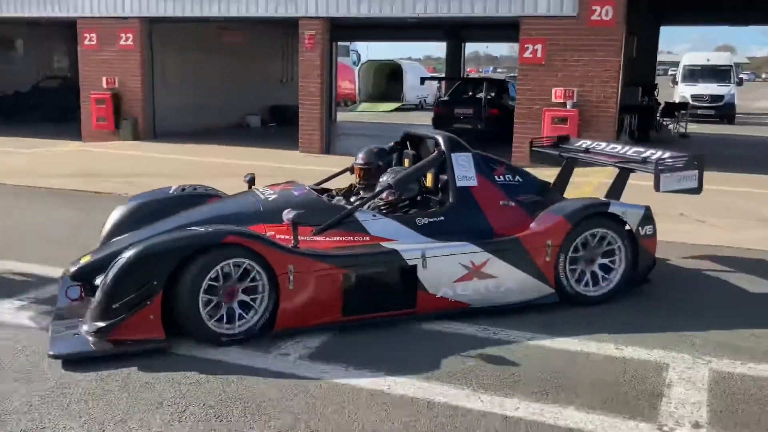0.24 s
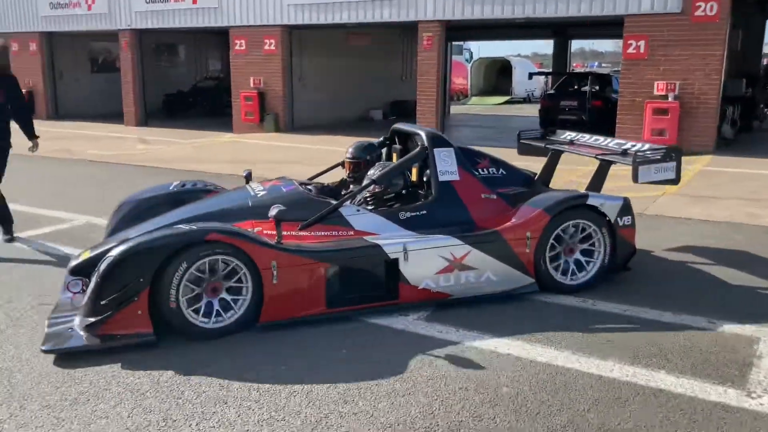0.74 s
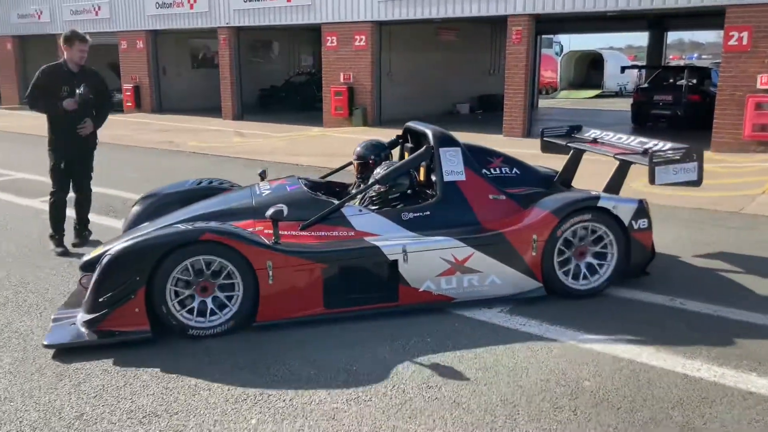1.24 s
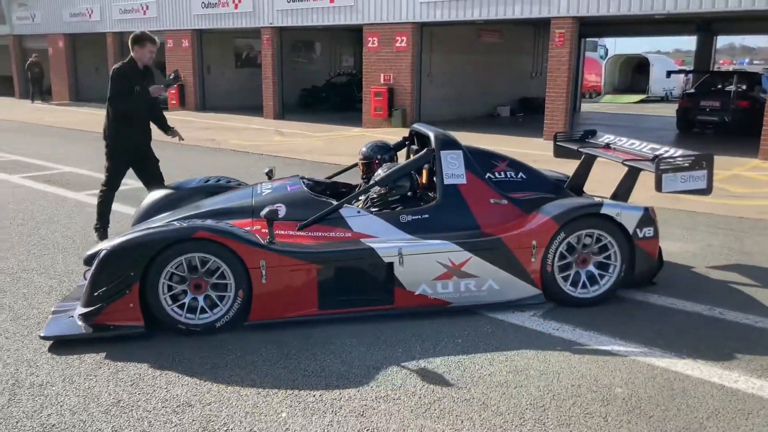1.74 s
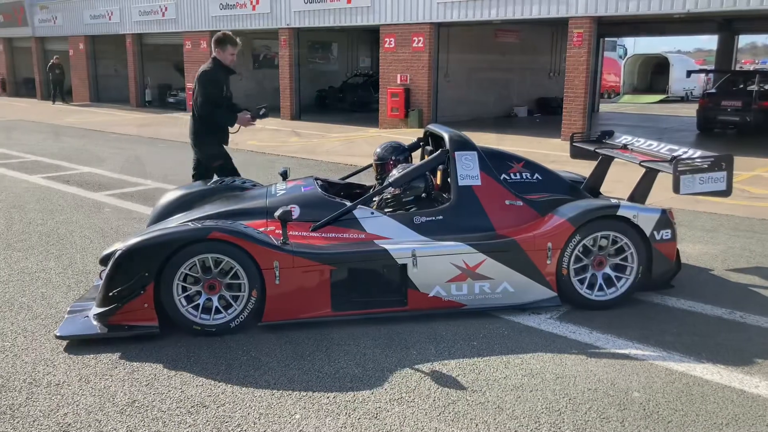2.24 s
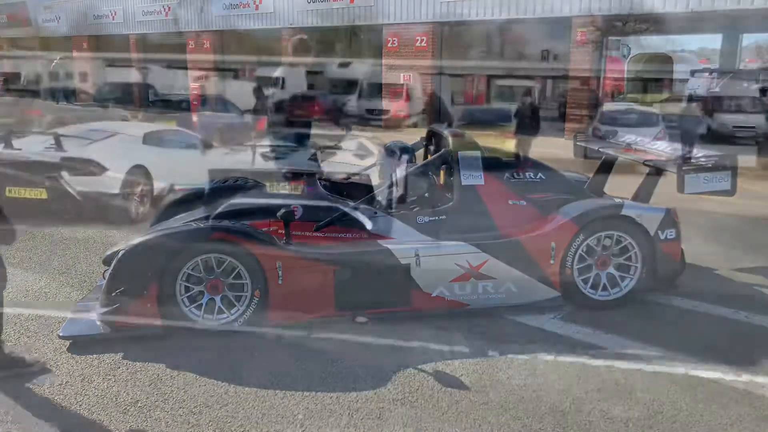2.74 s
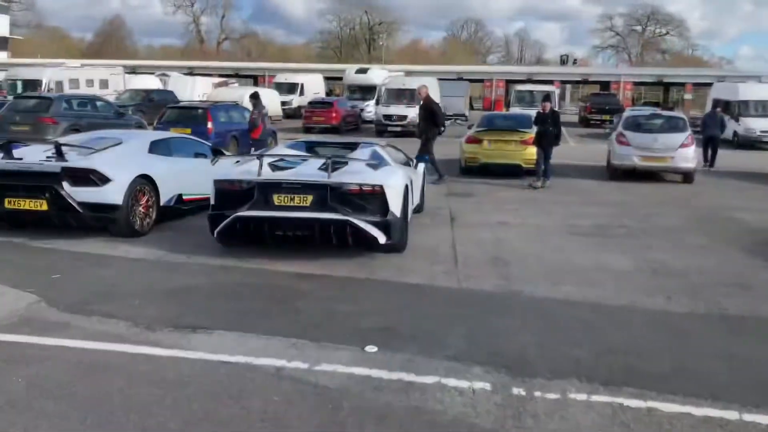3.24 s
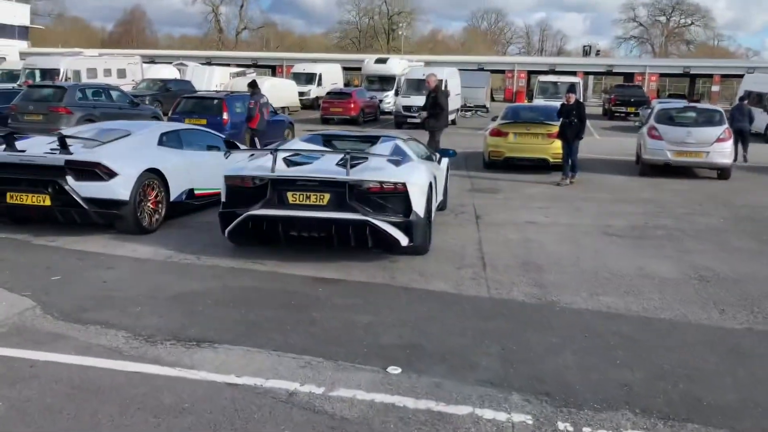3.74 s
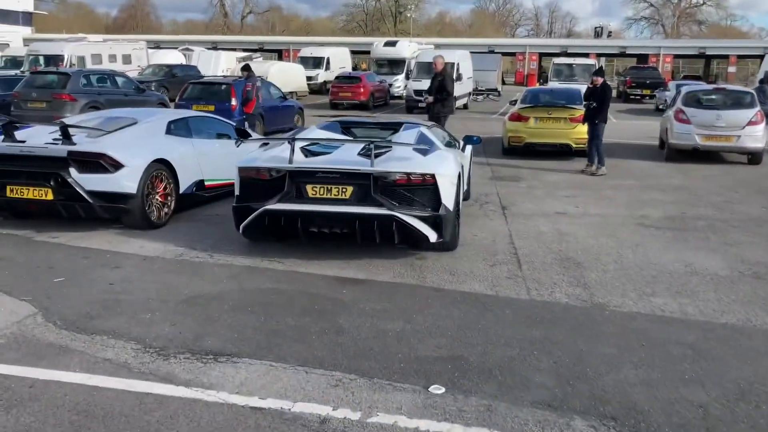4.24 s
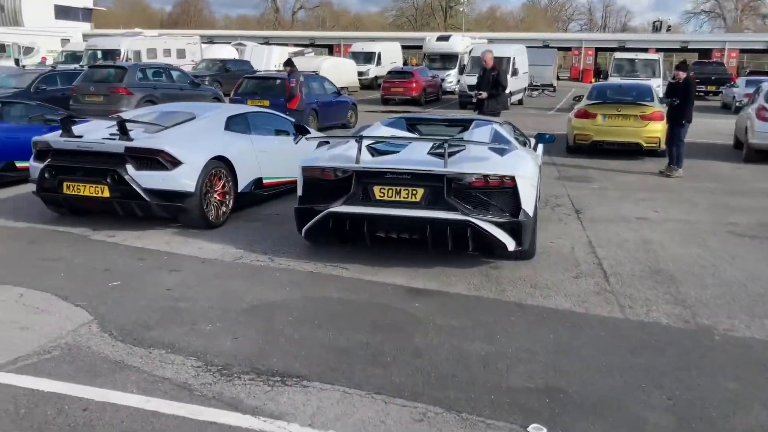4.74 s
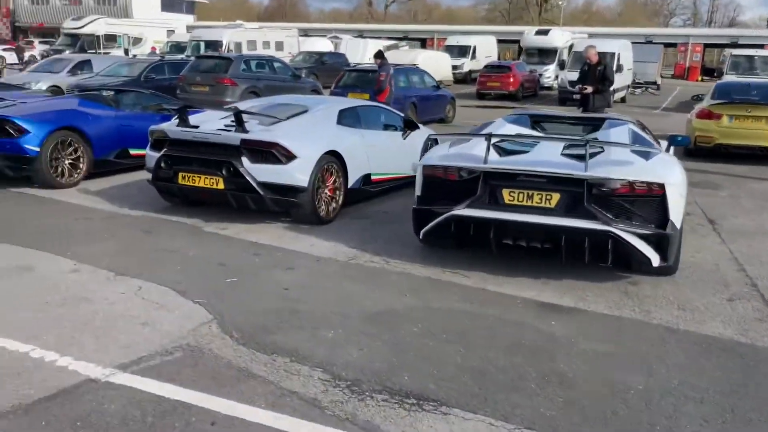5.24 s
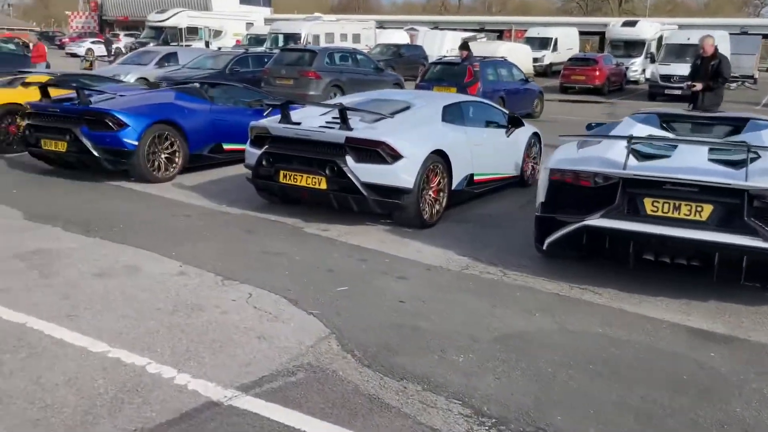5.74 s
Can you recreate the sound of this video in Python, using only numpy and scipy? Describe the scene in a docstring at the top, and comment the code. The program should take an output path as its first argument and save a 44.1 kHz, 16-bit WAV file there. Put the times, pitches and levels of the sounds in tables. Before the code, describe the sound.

Close to the microphone, a race car's engine holds a loud, throbbing idle with rattling and spits of air, joined by a short buzz and a light clink. About halfway through, the pit lane dissolves into an open car park. Gusts rumble on the microphone above a soft, humming wash of traffic, while a distant engine gently rises and falls and some dull taps come from slightly left.

```python
"""A racing engine idles close by in a pit lane: firings pulse the exhaust and ring the pipe, over clatter,
throbbing hiss and puffs of air. A panel buzzes at 1.4 s and a small part clinks at 1.8 s.
From 2.25 s the pit lane crossfades into a car park: wind buffets the microphone over a wash of traffic
with faint hums, and a far engine manoeuvres. From 4 s a few dull taps sound, a little to the left."""
import sys
import numpy as np
from scipy import signal
from scipy.fft import rfft, irfft
from scipy.io import wavfile
from scipy.ndimage import uniform_filter1d, minimum_filter1d

SR = 44100
rng = np.random.default_rng(int(sys.argv[2]) if len(sys.argv) > 2 else 0)


def dump(signal):
    """Clip the signal to [-1, 1] and save it as 16-bit WAV at the path in sys.argv[1]."""
    limited = np.clip(np.atleast_2d(signal).T, -1, 1)
    pcm = np.round(limited * 32767).astype(np.int16)
    wavfile.write(sys.argv[1], SR, pcm)


N = 264600
T = np.arange(N) / SR


def gain_of(db):
    """Decibels to gain."""
    return 10 ** (np.asarray(db) / 20)


def unit_rms(x):
    """Scales to rms 1."""
    return x / np.sqrt(np.mean(x ** 2) + 1e-20)


def automation(rows):
    """One lane per column after the time, read at every sample."""
    times, *columns = np.transpose(rows)
    return [np.interp(T, times, column) for column in columns]


def eq_db(curve, hz):
    """An EQ curve read on a log-frequency axis."""
    f, db = np.transpose(curve)
    return np.interp(np.log(hz + 1), np.log(f + 1), db)


def colour(x, curve):
    """Minimum-phase EQ, with the result scaled to rms 1."""
    log_gain = np.log(gain_of(eq_db(curve, abs(np.fft.fftfreq(16384, 1 / SR)))))
    phase = -signal.hilbert(log_gain).imag
    impulse = np.fft.ifft(np.exp(log_gain + 1j * phase)).real[:4096]
    return unit_rms(signal.oaconvolve(x, impulse)[:N])


def noise():
    """Fresh white noise."""
    return rng.standard_normal(N)


def drift(hz):
    """A random modulator moving at up to hz, rms 1."""
    lowpass = signal.butter(2, hz, fs=SR / 20, output="sos")
    slow = signal.sosfilt(lowpass, rng.standard_normal(N // 20 + 2000))[1999:]
    return unit_rms(np.interp(T, np.arange(len(slow)) * 20 / SR, slow))


def wavering_tone(hz, width_hz):
    """A tone that wavers in level and pitch, rms 1."""
    waver = 1 + 0.49 * drift(width_hz) + .6j * drift(width_hz)
    return unit_rms((waver * np.exp(2j * np.pi * hz * T)).real)


def noise_band(hz, width_hz):
    """A narrow band of noise, rms 1."""
    bandpass = signal.butter(1, [hz - width_hz / 2, hz + width_hz / 2], "band", fs=SR, output="sos")
    return unit_rms(signal.sosfilt(bandpass, noise()))


# Stereo image, how alike left and right sound and their phase offset: f/Hz, likeness/0-1, lead/turns
STEREO_IMAGE = [(60, 0.99, 0.0075), (288, 0.99, -0.067), (705, 1, -0.13), (1420, .35, -0.057),
                (2310, 0.64, -0.052), (3540, 0.13, -0.37), (4570, 0, -0.41), (5900, 1, -0.29),
                (6540, 0.93, -0.085), (7470, 0.66, -0.04), (8770, 1, .5), (9370, 1, .5),
                (10840, 0.87, 0.88), (11580, 0.9, -0.66), (13100, 0.8, 1.64), (14600, .99, 1.7),
                (15200, 0.7, 2)]
def stereo(source, pan_curve):
    """Left hears the source; right blends a phase-shifted copy with a second call of it."""
    hz = np.fft.rfftfreq(N, 1 / SR)
    f, likeness, lead = np.transpose(STEREO_IMAGE)
    likeness = np.clip(np.interp(hz, f, likeness), 0, 1)
    shift = np.exp(2j * np.pi * np.interp(hz, f, lead))
    left, second = rfft(source()), rfft(source())
    right = likeness * left * shift + np.sqrt(1 - likeness ** 2) * second
    pan = gain_of(eq_db(pan_curve, hz) / 2)
    return irfft(np.array([left * pan, right / pan]), N)


# Exhaust orders 1-6 at either end of the way round the car: start level/dB, end level/dB, shift/turns
EXHAUST_ORDERS = [(-17, -15.5, 0.048), (-12, -12, 0), (-17.5, -12.5, 0), (-23, -40, 0), (-28.5, -23.5, .5),
                  (-46, -33.5, 0)]
def exhaust_note(firings, way_round, note_db):
    """Harmonics locked to the firings; one that flips polarity on the way round dips out in between."""
    note = np.zeros(N)
    for order, (start_db, end_db, shift) in enumerate(EXHAUST_ORDERS, 1):
        end = gain_of(end_db) * np.exp(2j * np.pi * shift)
        blend = abs((1 - way_round) * gain_of(start_db) + way_round * end)
        level = np.sqrt(2) * blend * gain_of(note_db + 1.22 * drift(25.6))
        smear = 2.5 * order * (order - 1) / 2  # the pipe delays each order differently
        jitter = 0.069 * order * drift(26)
        note += level * np.cos(2 * np.pi * order * firings + smear + jitter)
    return note


# Three low tones between the orders and two faint upper engine harmonics: f/Hz, width/Hz, level/dB
LOOSE_TONES = [(101.6, 4.6, -30), (117.4, 2.7, -20.5), (244.8, 5.9, -31), (497.6, 24, -39),
               (863, 10.3, -44.5)]
def loose_tones(noise_db):
    """Wavering tones that thicken the exhaust note."""
    return gain_of(noise_db) * sum(gain_of(db) * wavering_tone(f, width) for f, width, db in LOOSE_TONES)


# Resonances of the exhaust pipe: f/Hz, level/dB
PIPE_EQ = [(25, -31), (45, -12), (62, -4), (105, -0.5), (135, -0.5), (190, -5), (250, -0.5), (290, -8.5),
           (330, -14), (365, -9), (410, -23.5), (460, -26), (520, -16.5), (650, -27), (900, -41.5),
           (2500, -92)]
def uneven_firings(gush, noise_db):
    """Irregular gushes of gas ring the pipe with a low burble."""
    return gain_of(-13 + noise_db) * colour(gush, PIPE_EQ)


# Tone of the mechanical clatter: f/Hz, level/dB
CLATTER_EQ = [(300, -24), (470, -4.5), (520, -1), (620, -8.5), (870, -7.5), (1050, -14), (1630, -16.5),
              (2050, -19.5), (2430, -16.5), (2700, -27.5), (2850, -18.5), (3300, -18), (3650, -23),
              (3900, -19), (5200, -26), (5600, -27.5), (9000, -40.5)]
def clatter(gush, noise_db):
    """Pulsing noise and random ticks ring in the mids, with rattling panels on top."""
    ticks_per_s = 3000
    ticks = gain_of(2.0 * rng.exponential(1, N)) * (rng.random(N) < ticks_per_s / SR) * noise()
    body = colour(gush + 0.18 * unit_rms(ticks), CLATTER_EQ)
    return gain_of(-31 + 0.66 * noise_db) * (body + panel_rattles())


# Buzzing panels: f/Hz, width/Hz, level/dB relative to the clatter
PANELS = [(1676, 140, -13), (2326, 300, -11), (2880, 200, -16.5), (3600, 230, -14.5), (4780, 1060, -18.5)]
def panel_rattles():
    """Each panel buzzes in a narrow band, swelling in its own time."""
    return sum(gain_of(db + 2.5 * drift(2.24)) * noise_band(hz, width) for hz, width, db in PANELS)


# Tone of the hiss: f/Hz, level/dB
HISS_EQ = [(2500, -60), (4500, -10), (5600, -2), (7300, 1.5), (8200, 2), (10500, 5), (12500, 3.5),
           (13500, -5), (16500, -2.5)]
def hiss(throb_db, noise_db):
    """Bright air that throbs with the valve gear."""
    return gain_of(-41.5 + 0.76 * noise_db + throb_db) * colour(noise(), HISS_EQ)


# Puff cues: t/s, level/dB, t60/s
PUFF_CUES = [(0.042, -33, .15), (.7, -38, 0.14), (.98, -35, 0.089), (1.211, -38, 0.22), (1.618, -41, 0.099),
             (1.988, -30, 0.46), (2.14, -34.5, 0.08)]
# Tone of the puffs: f/Hz, level/dB
PUFF_EQ = [(3000, -44), (7000, -5.5), (10000, 4), (13500, 2), (16500, -12)]
def air_puffs():
    """Spits of air with a sharp attack and a short tail."""
    envelope = sum(gain_of(db - 60 * np.maximum(T - at_s, 0) / t60) * np.clip((T - at_s) / 0.0025, 0, 1)
                   for at_s, db, t60 in PUFF_CUES)
    return envelope * colour(noise(), PUFF_EQ)


# The idle: t/s, firing rate/Hz, listener's way round the car/0-1, note level/dB, noise level/dB
IDLE_LANES = [(0, 72.44, 0, -0.5, -2), (.15, 71.15, 0, 1, .5), (.4, 71.8, .45, 0, 0.5),
              (.6, 70.91, 0.69, -1.5, -1), (.8, 71.08, 0.85, 0, 3), (1.05, 71.51, 0.93, 1, 1.5),
              (1.35, 71.5, 1, 0, -.5), (1.55, 71.48, 1, -0.5, 0), (1.9, 71.8, 0.98, -0.5, -2),
              (2.25, 71.88, 0.96, -1.5, -4), (2.85, 71.6, 0.9, -1.3, -5.5)]
# Pit lane panning: f/Hz, left over right/dB
PIT_PAN = [(60, -2), (150, -0.5), (380, 3), (700, 3), (1300, 5), (2400, 1.5), (4400, 0), (15000, 0)]
def racing_engine(valve_hz=24.5):
    """The engine bus: one slightly unsteady firing rate drives the note and the gushes of gas."""
    firing_hz, way_round, note_db, noise_db = automation(IDLE_LANES)
    firings = np.cumsum(firing_hz * (1 + 0.0065 * drift(9.2))) / SR
    tones = exhaust_note(firings, np.clip(way_round, 0, 1), note_db) + loose_tones(noise_db)
    throb_db = 1.5 * np.cos(2 * np.pi * valve_hz * T) + 2.0 * drift(42)

    def grit():
        """The noisy layers, fresh on each call."""
        gush = (1 + 0.062 * np.cos(2 * np.pi * firings)) * noise()  # one gush per firing
        body = uneven_firings(gush, noise_db) + clatter(gush, noise_db)
        return body + hiss(throb_db, noise_db) + air_puffs()
    return stereo(lambda: tones, PIT_PAN) + stereo(grit, PIT_PAN)


# Buzz cue: centre t/s, half-length/s, f/Hz, width/Hz, level/dB
BUZZ_CUE = (1.4, .16, 2480, 260, -38)
def panel_buzz():
    """A panel buzzes up once and dies away."""
    centre_s, half_s, hz, width, db = BUZZ_CUE
    swell = gain_of(db) * np.exp(-((T - centre_s) / half_s) ** 2)
    return stereo(lambda: swell * noise_band(hz, width), PIT_PAN)


# Modes of the small part: f/Hz, level/dB, t60/s
PART_MODES = [(2600, -5, .035), (2830, 12, 0.058), (3160, 9, 0.041), (4000, 7, 0.051), (6800, 7, 0.058)]
def clink(at_s=1.821):
    """A small part is knocked near the car: a brief, rough ring with a dry scrape."""
    age = np.maximum(T - at_s, 0)
    attack = gain_of(-31) * np.clip(age / 0.0068, 0, 1)
    ring = sum(gain_of(db - 60 * age / t60) * np.sin(2 * np.pi * hz * age) for hz, db, t60 in PART_MODES)
    scrape_eq = [(800, -28), (2500, 2), (7000, -12), (12000, -8), (16000, -25)]  # f/Hz, level/dB
    scrape_tail = 1.3 * gain_of(-60 * age / 0.24)

    def knock():
        """Ring and scrape under one attack."""
        return attack * (ring * (0.83 + .5 * drift(400)) + scrape_tail * colour(noise(), scrape_eq))
    return stereo(knock, PIT_PAN)


# Gust cues: centre t/s, half-length/s, rumble level/dB, flutter level/dB
GUST_CUES = [(3.368, 0.067, -29, -35.5), (3.64, .12, -34, -44), (3.843, 0.086, -31, -36.5),
             (4.1, 0.092, -37, -45.5), (4.29, 0.068, -33, -43), (4.448, 0.084, -37, -39),
             (4.694, 0.14, -29, -36), (4.957, 0.074, -31, -34), (5.102, 0.065, -29.5, -41.5),
             (5.27, 0.089, -30, -43.5), (5.567, 0.093, -35, -47), (5.93, 0.096, -44, -44)]
# Tone of the deep rumble: f/Hz, level/dB
RUMBLE_EQ = [(10, -36), (25, -14.5), (40, -4.5), (55, 2.5), (80, 2.5), (130, -5.5), (200, -15.5),
             (300, -31), (600, -80)]
# Tone of the flutter above it: f/Hz, level/dB
FLUTTER_EQ = [(40, -22), (90, -18.5), (160, 4.5), (250, -3), (400, -11.5), (800, -26.5), (2000, -69)]
def wind(lull_rumble_db=-38, lull_flutter_db=-47):
    """Lumpy pressure on the microphone, in mono; each gust lifts the rumble and the flutter."""
    rumble_gain, flutter_gain = gain_of(lull_rumble_db), gain_of(lull_flutter_db)
    for centre_s, half_s, rumble_db, flutter_db in GUST_CUES:
        swell = np.exp(-((T - centre_s) / half_s) ** 2)
        rumble_gain += gain_of(rumble_db) * swell
        flutter_gain += gain_of(flutter_db) * swell
    rumble = colour(noise(), RUMBLE_EQ)
    # gentle compression keeps the buffets coming without long lulls
    rumble = unit_rms(rumble / uniform_filter1d(rumble ** 2, size=5000) ** 0.17)
    flutter = colour(gain_of(2.8 * drift(24.6)) * noise(), FLUTTER_EQ)
    return rumble_gain * rumble + flutter_gain * flutter


# Tone of the traffic bed: f/Hz, level/dB
TRAFFIC_EQ = [(150, -29.5), (350, -5), (650, 1), (800, -4.5), (1300, -9), (1600, -8.5), (2400, -13.5),
              (3500, -20), (5500, -26.5), (7000, -30), (10000, -27.5), (12000, -35), (16500, -60)]
# Its fader: t/s, level/dB
TRAFFIC_FADER = [(3.2, -46), (4.2, -46), (5.2, -48), (5.6, -47), (6, -47.5)]
# Its panning: f/Hz, left over right/dB
TRAFFIC_PAN = [(300, 1.5), (1300, 2.5), (2200, -1), (4000, -2.5), (8000, 0)]
def traffic():
    """Far traffic blurs into a soft, wavering wash."""
    wash = stereo(lambda: colour(noise(), TRAFFIC_EQ), TRAFFIC_PAN)
    return wash * gain_of(automation(TRAFFIC_FADER)[0] + drift(11.3))


# Hum cues: f/Hz, width/Hz, level/dB, in t/s, out t/s
HUM_CUES = [(658, 6, -54, 2.6, 4.6), (658, 5, -52, 5.25, 6.3), (632, 6, -58, 4.5, 5.4),
            (1206, 5, -59, 2.6, 3.7), (1206, 5, -65, 3.6, 4), (1367, 5, -62, 3.4, 4.1),
            (1367, 5, -63, 4.7, 5.8), (534, 5, -57, 4.1, 5), (462, 6, -57, 3.5, 4.5),
            (440, 9, -53, 5.4, 6.3), (880, 6, -64, 4.9, 5.5), (147, 5, -41, 2.6, 6.3),
            (85, 5, -37, 5.5, 6.3), (88, 5, -36, 5.8, 6.3), (1505, 25, -64, 4.4, 6.3)]
def far_hums(fade_s=0.15):
    """Faint hums and whines come and go in the traffic."""
    out = np.zeros(N)
    for hz, width, db, in_s, out_s in HUM_CUES:
        fade = np.clip(np.minimum(T - in_s, out_s - T) / fade_s, 0, 1)
        out += gain_of(db) * wavering_tone(hz, width) * fade
    return out


# Revs of the far engine: t/s, firing rate/Hz, level/dB
FAR_REVS = [(3.27, 50.2, -35), (4.2, 56.8, -37), (4.27, 56.7, -31.5), (4.42, 47.5, -37),
            (4.57, 57.14, -25.5), (4.87, 63.8, -28), (5.0, 61.4, -39), (5.17, 53.9, -37),
            (5.26, 52.16, -27.5), (5.41, 50.1, -36)]
def far_engine(out_s=5.6):
    """An engine manoeuvres across the car park: a low note and its octave glide with the revs."""
    firing_hz, db = automation(FAR_REVS)
    phase = 2 * np.pi * np.cumsum(firing_hz) / SR
    note = np.sin(phase) + 0.38 * np.sin(2 * phase)
    fade_out = np.clip((out_s - T) / 0.18, 0, 1)
    return np.sqrt(2) * gain_of(db + 0.41 * drift(13)) * note * fade_out


# Tap cues: t/s, level/dB, lowest mode f/Hz, left over right/dB
TAP_CUES = [(4.065, -41, 604, 5), (4.232, -36, 625, 1), (4.452, -36, 940, 7), (4.622, -30, 697, 7),
            (5.952, -32, 606, 1)]
def taps(attack_s=0.0062, t60=.05):
    """Short dull taps, each ringing four damped modes."""
    out = np.zeros((2, N))
    for at_s, db, hz, pan_db in TAP_CUES:
        age = np.maximum(T - at_s, 0)
        ring = sum(np.sin(2 * np.pi * ratio * hz * age) / ratio ** 2 for ratio in (1, 1.25, 1.55, 2.1))
        envelope = gain_of(-60 * age / t60) * np.clip(age / attack_s, 0, 1)
        out += gain_of([[db + pan_db / 2], [db - pan_db / 2]]) * ring * envelope
    return out


def scene():
    """The pit lane crossfades into the car park."""
    pit_lane = racing_engine() + panel_buzz() + clink()
    car_park = wind() + traffic() + far_hums() + far_engine() + taps()
    fade_start_s, fade_end_s = 2.25, 3.19
    crossfade = np.interp(T, (fade_start_s, fade_end_s), (0, 1))
    return (1 - crossfade) * pit_lane + crossfade * car_park


def record(dry):
    """Master chain: a quick limiter evens out the tallest exhaust pulses, then a steep high cut."""
    threshold, window_samples, high_cut_hz = .86, 600, 15750
    peak = -minimum_filter1d(-abs(dry).max(0), size=window_samples)
    reduction = uniform_filter1d(np.maximum(peak / threshold, 1) ** .9, size=window_samples)
    high_cut = signal.firwin(511, high_cut_hz, window=("kaiser", 9), fs=SR)
    return signal.oaconvolve(dry / reduction, high_cut[None], "same")


dry = scene()
out = record(dry)
dump(out)
```